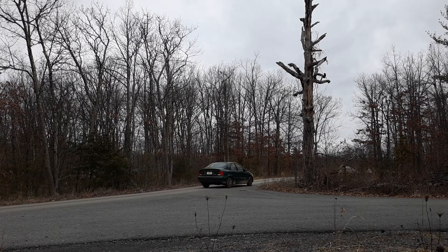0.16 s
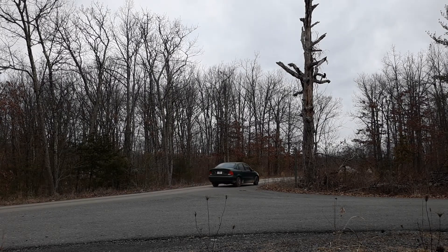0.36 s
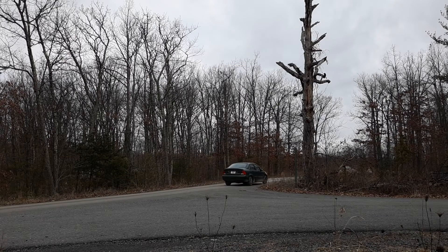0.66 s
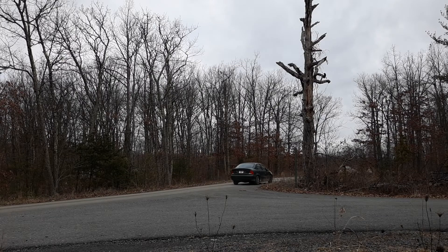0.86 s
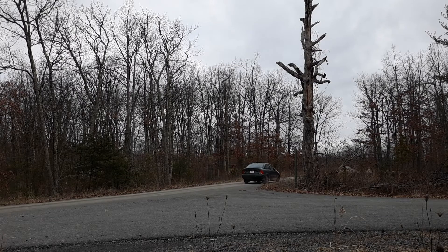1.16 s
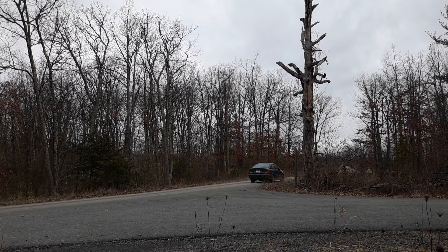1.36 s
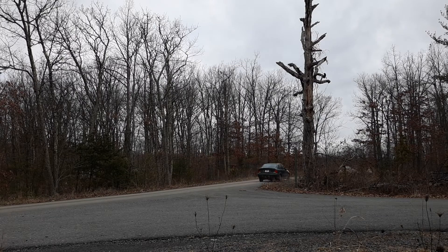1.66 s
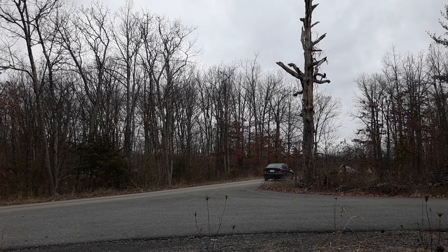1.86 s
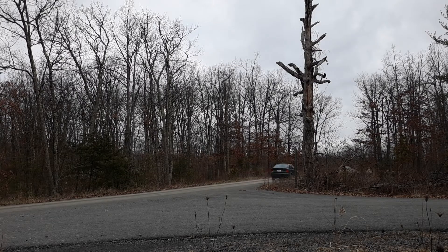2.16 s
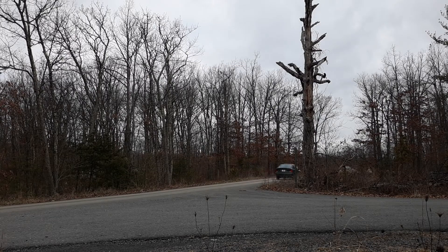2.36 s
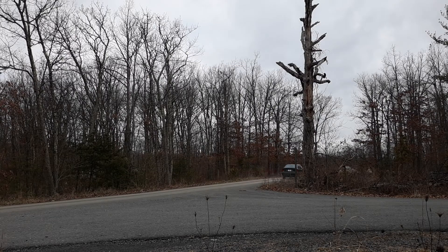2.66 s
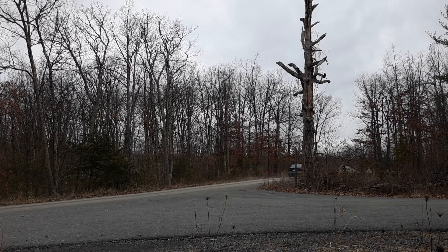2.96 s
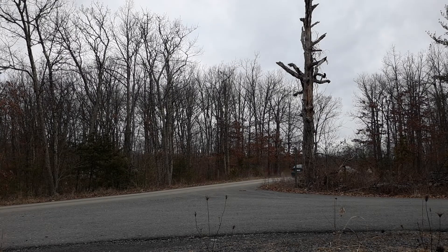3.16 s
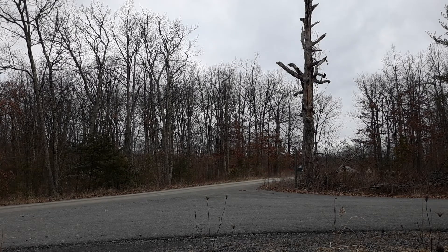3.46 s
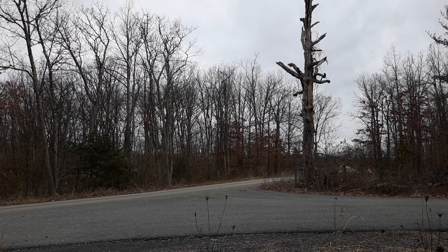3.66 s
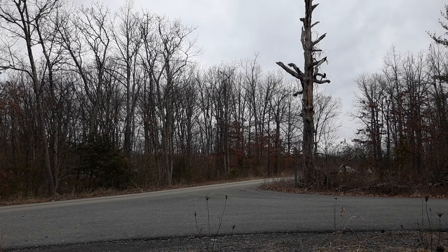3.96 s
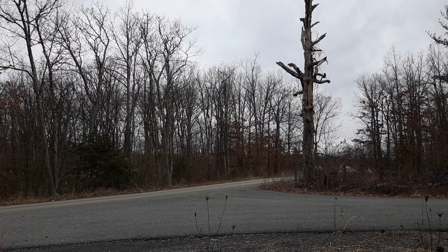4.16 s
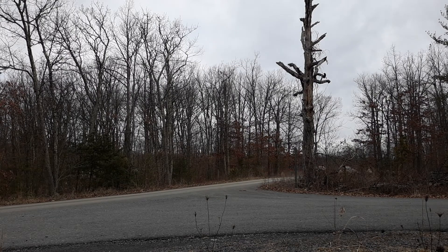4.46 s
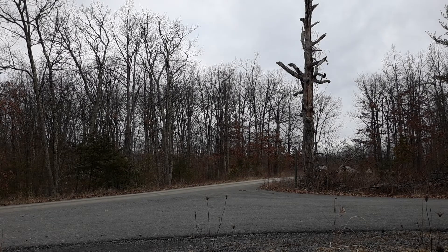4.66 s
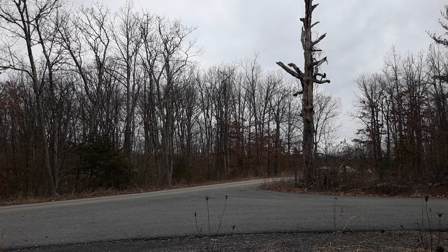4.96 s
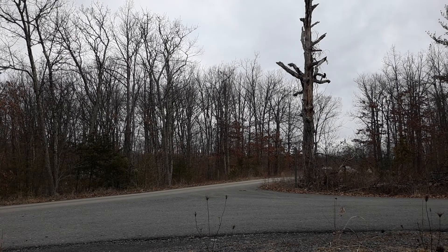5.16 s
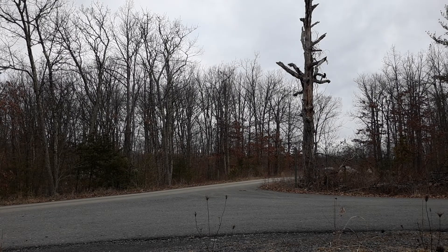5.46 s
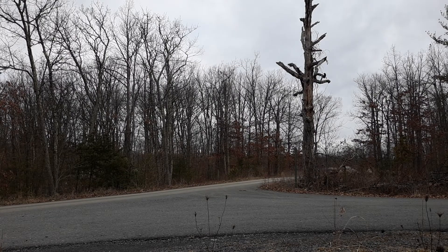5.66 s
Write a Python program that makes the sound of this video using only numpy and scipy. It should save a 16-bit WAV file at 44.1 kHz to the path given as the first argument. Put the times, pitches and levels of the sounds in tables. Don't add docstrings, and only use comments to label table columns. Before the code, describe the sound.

Raspy, booming exhaust climbs in pitch, drops at a gear change, and recedes among bare trees with a few faint bird whistles.

```python
import sys
import numpy as np
from scipy import signal
from scipy.fft import rfft, irfft, next_fast_len
from scipy.io import wavfile
from scipy.ndimage import uniform_filter1d

SR = 44100
rng = np.random.default_rng(int(sys.argv[2]) if len(sys.argv) > 2 else 0)


def transcribe(u):
    v = np.clip(np.atleast_2d(u).T, -1, 1)
    q = np.round(v * 32767).astype(np.int16)
    wavfile.write(sys.argv[1], SR, q)


def elevation(decibels):
    levels = np.asarray(decibels, float)
    return 10 ** (levels / 20)


N = 255766
DROP_AT, DROPPED = 30046, 1024
LONG = N + DROPPED
PADDED = next_fast_len(LONG + 8192)


def clock():
    n = np.arange(LONG)
    return (n - np.clip(n - DROP_AT, 0, DROPPED)) / SR


def high_gear():
    shift_s, shift_takes_s = 2.16, 0.06
    return 0.5 + 0.5 * np.tanh((clock() - shift_s) / shift_takes_s)


def in_time(rows):
    s, *columns = np.transpose(rows)
    return [np.interp(clock(), s, c) for c in columns]


def rms_one(x):
    return x / np.sqrt(np.mean(x ** 2) + 1e-20)


def at_hz(points, hz):
    points = np.array(points)
    return np.interp(np.log(hz), np.log(points[:, 0]), points[:, 1])


def drift(rate):
    r = np.exp(-80 * np.pi * rate / SR)
    noise = rng.standard_normal(LONG // 40 + 2002)
    slow = signal.lfilter([1], [1, -2 * r, r * r], noise)[2000:]
    return np.interp(np.arange(LONG) / 40, np.arange(len(slow)), rms_one(slow))


def resonance(x, hz, width):
    r = np.exp(-np.pi * width / SR)
    poles = [1, -2 * r * np.cos(2 * np.pi * hz / SR), r * r]
    return signal.lfilter([(1 - r * r) / 2, 0, (r * r - 1) / 2], poles, x)


def shaped(x, gain):
    hz = np.maximum(np.arange(PADDED // 2 + 1) * SR / PADDED, 1)
    return irfft(rfft(x, PADDED) * gain(hz), PADDED)[..., :LONG]


def stereo(mid, side, spectrum, lag):
    # f/Hz, likeness [0..1]
    likeness = [(60, .97), (290, .95), (640, .85), (1400, .68), (3100, .65), (5500, .4), (8000, .05),
                (15000, .02)]
    ports = np.array([[1], [-1]])

    def colour(hz):
        return elevation(at_hz(spectrum, hz))

    def alike(hz):
        return np.clip(at_hz(likeness, hz), 0, 1)

    def shared_gain(hz):
        return colour(hz) * np.sqrt(1 + alike(hz)) * np.exp(-1j * np.pi * hz * lag * ports / SR)

    shared = shaped(mid, shared_gain)
    return shared + ports * shaped(side, lambda hz: colour(hz) * np.sqrt(1 - alike(hz)))


def boom(turns, hz, level_db, near_db, tilt_db):
    orders = (1, 1.5, 2, 2.25, 2.5, 2.75, 3, 3.25, 3.5, 4, 4.5, 5, 6, 6.25, 6.5, 6.75, 7.25, 7.5)
    # low gear level/dB, its rise [dB per dB of nearness], then both for high gear
    orders_db = [(-9, -0.1, -19, 1.7), (-38, 0.6, -39.5, 0), (-0.5, 0.12, -2, 0.82),
                 (-42.5, -1, -38.5, 3.5), (-19.5, -4.2, -31, 0.5), (-24.5, -2.5, -36.5, 0.2),
                 (-2, 0.58, -3.5, 0.85), (-35.5, -3.5, -39, -2), (-20, 1.09, -16, 1.7),
                 (-14.5, 0.82, -24, 3.5), (-41, -2, -41, 4.5), (-21.5, -.4, -32.5, 2.5),
                 (-32, 1.3, -51, .9), (-31.5, 0.82, -40.5, 2), (-36.5, 1.53, -49, 5.6),
                 (-38, 1.24, -50.5, 5), (-34.5, 0.73, -45.5, -1), (-35, 1.1, -48.5, 1.5)]
    # f/Hz, level/dB
    silencer = [(300, -0.05), (328, 1), (343, -2), (372, -3.5), (404, 5), (428, -6), (445, -10),
                (475, -1.1)]
    high_gear_near_db = -7
    out, high = 0, high_gear()
    for order, (low_db, low_follows, high_db, high_follows) in zip(orders, orders_db):
        in_low_db = low_db + low_follows * near_db
        in_high_db = high_db + high_follows * (near_db - high_gear_near_db)
        db = (1 - high) * in_low_db + high * in_high_db
        db = db + level_db + tilt_db * ((order == 3) - (order == 2))
        db = db + 0.35 * order * (order not in (2, 3)) * drift(3)
        db = db + at_hz(silencer, order * hz) + 0.5 * drift(12.0)
        pipe_delay = 0.85 * (order - 2) ** 2
        flutter = 0.0025 * order ** 3 * drift(6)
        out = out + np.sqrt(2) * elevation(db) * np.cos(2 * np.pi * order * turns + pipe_delay + flutter)
    return out


def cracks(turns):
    cylinders = [(0, -2), (1, -1.5), (2, -5), (3, 2)]
    turn, since = np.divmod(turns, 1)
    turn = turn.astype(int)
    chance_db = 0.9 * rng.standard_normal(LONG // 100)[turn]
    size = elevation(np.array(cylinders)[turn % 4, 1] + chance_db)
    front = np.diff(turn, prepend=turn[0]) * elevation(13.0)
    burst = np.exp(-since / 0.12) * rng.standard_normal(LONG)
    return rms_one(size * (burst - front))


def rasp(turns, near_db):
    rasp_hz = (700, 1900, 4500)
    rasp_follows = (0.84, 1.096, 0.92)
    rasp_lifts_db = (-3, 1.14, 0.2)
    # f/Hz, width/Hz, level/dB, t/s, span/s, swell/dB
    pipe = [(525.3, 23, -2, 0.27, 0.076, -4), (721, 29.5, 1, 0.52, 0.64, 4.5),
            (742, 53, -1.5, 1.7, 0.27, 2), (1008, 53, 1.95, 1.75, 0.42, 4), (1271, 37, -4, 0.59, 0.1, -0.5),
            (1529, 46, 1, 0.064, 0.18, 1), (1790, 32, -8.5, 0.72, 0.22, 10.5), (1995, 49, -0.5, 1.9, .4, 3),
            (2315, 71, -6, 1.4, 1, 2.5), (2578, 109, 0, 0.44, 0.11, 11), (3170, 650, -14, 0.79, 0.71, 9.5),
            (3560, 190, -1, 1.17, 0.16, 7), (4360, 470, -26.5, 0.09, 0.34, 16)]
    # f/Hz, level/dB per Hz
    colour = [(30, -22), (60, -14), (110, -7), (200, 1.5), (330, -3.5), (420, -11.5), (900, -12.5),
              (1800, -10), (2700, -19), (4200, -20), (6600, -27), (7400, -39), (9000, -44.5), (11500, -71)]

    direct_db = np.minimum(-2.5 + 0.55 * near_db - 5 * high_gear(), 1.5)
    share = 1 / (1 + elevation(-2 * direct_db))
    crack = np.sqrt(share) * cracks(turns)
    scatter = rng.standard_normal((2, LONG)) * [np.sqrt(1 - share), np.ones(LONG)]
    mid_only = np.array([[1], [0]])

    high_pass = signal.butter(2, 3800, "high", fs=SR, output="sos")
    treble = signal.sosfilt(high_pass, crack - np.sqrt(share) * rng.standard_normal(LONG))
    piped = elevation(-8.5) * (scatter + mid_only * (elevation(-5) * crack - elevation(-13) * treble))

    taste = rng.standard_normal((LONG // 100, len(pipe)))
    taste = uniform_filter1d(taste, size=2, axis=1) * np.sqrt(2)
    for k, (hz, width, db, at, span, swell_db) in enumerate(pipe):
        swell = np.exp(-0.5 * ((clock() - at) / span) ** 2)
        level_db = db + swell_db * swell + 1.46 * drift(3.2)
        source = scatter + mid_only * crack * elevation(1.5 * taste[turns.astype(int), k])
        piped = piped + elevation(level_db) * resonance(source, hz, width) * (-1) ** k
    both = stereo(*piped, colour, 1)

    out = 0
    for k, (follows, lifts_db) in enumerate(zip(rasp_follows, rasp_lifts_db)):
        def band_gain(hz):
            place = np.interp(np.log(hz), np.log(rasp_hz), [0, 1, 2])
            return np.maximum(0, 1 - abs(place - k))
        db = follows * near_db + lifts_db * high_gear()
        out = out + elevation(db - db.mean()) * shaped(both, band_gain)
    return elevation(-19.0) * out


def fizz(turns, near_db):
    band = signal.butter(3, [8100, 9950], "band", fs=SR, output="sos")
    throb_db = 2.2 * (1 - high_gear()) * np.cos(np.pi * (turns - 1.2)) ** 3 + 1.1 * drift(8)
    level_db = -70.5 + 0.75 * near_db - 3 * high_gear() + throb_db
    gas = rms_one(signal.sosfilt(band, rng.standard_normal((2, LONG))))
    return elevation(level_db + np.array([[-1.2], [1.2]])) * gas


def birds():
    # t/s, length/s, first f/Hz, last f/Hz, level/dB
    notes_sung = [
        (2.114, .016, 7100, 8300, -68),
        (2.175, .045, 8600, 7400, -81),
        (3.938, 0.037, 7500, 7000, -62.5),
        (4.328, .045, 9000, 7260, -72),
        (4.368, 0.05, 7400, 10700, -67),
        (4.482, .026, 8250, 7440, -68),
        (4.506, .022, 7300, 6350, -60),
        (4.522, 0.069, 6620, 6480, -67),
    ]
    fall_bend, rise_bend, echo_db = 2.0, 5.0, -17
    out = np.zeros(LONG)
    for s, length, first_hz, last_hz, db in notes_sung:
        along = np.linspace(0, 1, int(length * SR))
        height = along ** rise_bend if last_hz > first_hz else (1 - along) ** fall_bend
        hz = min(first_hz, last_hz) + abs(last_hz - first_hz) * height
        whistle = np.sin(np.pi * along) * np.sin(2 * np.pi * np.cumsum(hz) / SR)
        start = int(s * SR) + DROPPED
        out[start:start + len(hz)] += np.sqrt(2) * elevation(db) * whistle
    echo = elevation(echo_db) * np.roll(out, 700)
    return (out + echo) * elevation(np.array([[-4.5], [3.5]]))


def hum():
    # f/Hz, left level/dB, right level/dB
    hum_lines = [(120.8, -46, -42.5), (240.6, -59.5, -54), (360, -69, -52), (464, -89, -58.5),
                 (553, -82, -75.5), (712, -68, -57)]
    t = np.arange(LONG) / SR
    out = 0
    for hz, left_db, right_db in hum_lines:
        level = elevation(np.array([[left_db], [right_db]]) + 0.4 * drift(0.3))
        out = out + np.sqrt(2) * level * np.sin(2 * np.pi * (hz * t + rng.random()))
    return out


def hiss():
    # f/Hz, level/dB per Hz
    spectrum = [(30, -1.5), (300, -9.5), (2000, -5.5), (6600, -14.5), (7500, -28.5), (9200, -29.5),
                (10400, -22.5), (15600, -25)]
    return elevation(-63) * rms_one(stereo(*rng.standard_normal((2, LONG)), spectrum, 0.11))


def drop_block(whole):
    # left level/dB, right level/dB
    step_db = (-24, -20)
    joined = np.delete(whole, np.s_[DROP_AT:DROP_AT + DROPPED], axis=1)
    gap = elevation(np.array(step_db)) - (joined[:, DROP_AT] - joined[:, DROP_AT - 1])
    joined[:, DROP_AT:] += gap[:, None] * np.exp(-np.arange(N - DROP_AT) / 40)
    return joined


def scene():
    # t/s, base order f/Hz, boom level/dB, rasp level/dB, tilt of third over second order/dB
    engine = [(0, 71.9, -25, -29.5, -2), (.13, 73.2, -24.5, -28.5, -2.5), (.4, 75.4, -24, -31.5, 0),
              (.62, 77.2, -23.5, -34.5, -1.5), (.86, 79.6, -23.5, -34.5, 0), (1.0, 80.5, -25.5, -37, .5),
              (1.25, 82.1, -25.5, -40, -1), (1.62, 84.9, -26.5, -41, 1.5), (1.9, 86.5, -26, -42.5, -0.5),
              (2.11, 87.2, -26.5, -43.5, -1), (2.19, 82.9, -27, -44, 0.5), (2.3, 74, -23.5, -46.5, 0.5),
              (2.44, 69.1, -26, -46, -.5), (2.7, 67.3, -26.5, -46, -1.5), (3.1, 68.6, -25, -46.5, -.5),
              (3.7, 70.2, -24.5, -47, -.5), (4.8, 72.4, -25, -48.5, 0.5), (5.8, 72.5, -25, -50.5, 0.5)]
    hz, boom_db, rasp_db, tilt_db = in_time(engine)
    near_db = rasp_db + 41
    turns = np.cumsum(hz) / SR + 0.6
    low = boom(turns + 0.71, hz, boom_db, near_db, tilt_db)
    lag = 4.5 * np.clip(clock() / 1.2, 0, 1)
    n = np.arange(LONG)
    low = np.array([np.interp(n - lag, n, low) * elevation(-2.0), low * elevation(-0.65)])
    car = low + rasp(turns, near_db) * elevation(np.array([[-1.2], [1.2]])) + fizz(turns, near_db)
    return drop_block(car + birds() + hum() + hiss())


def roll_off(x):
    return signal.sosfilt(signal.butter(12, 15740, fs=SR, output="sos"), x)


def record(dry):
    top = signal.ellip(10, 0.3, 60, 15760, fs=SR, output="sos")
    n = np.arange(N)
    edge_s = 0.008
    fade = np.clip(np.minimum(N - n, 4 * n) / (edge_s * SR), 0, 1)
    return roll_off(signal.sosfilt(top, dry * fade))


dry = scene()
out = record(dry)
transcribe(out)
```